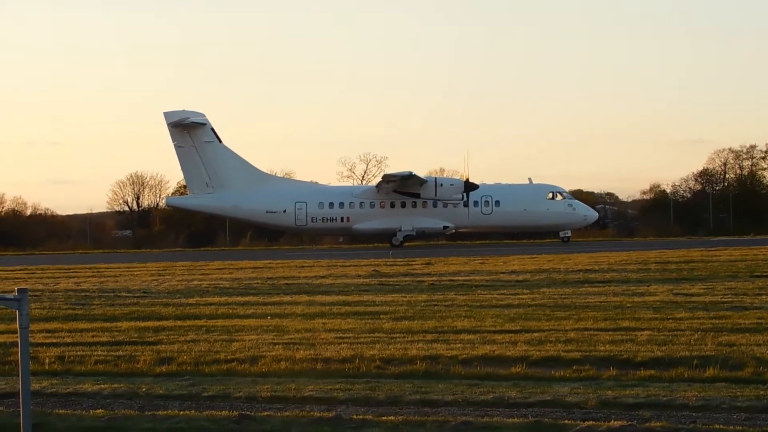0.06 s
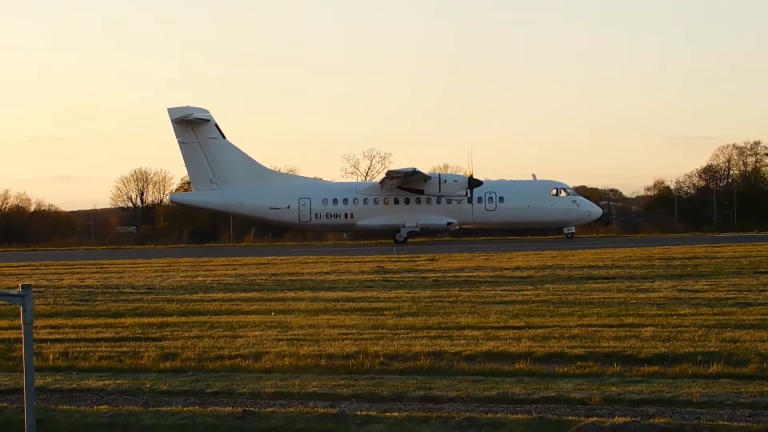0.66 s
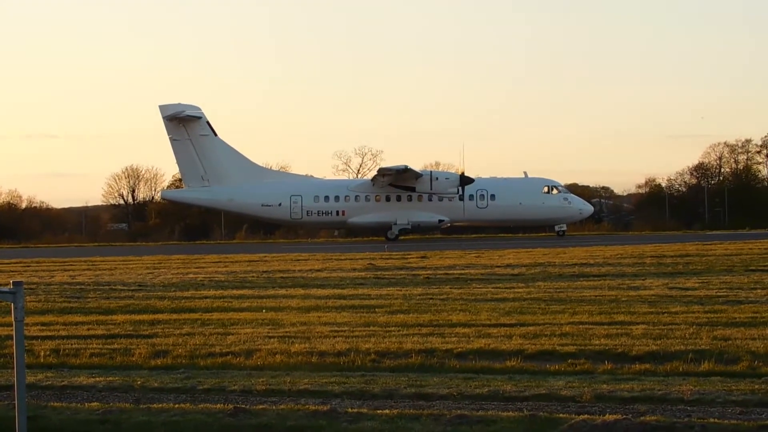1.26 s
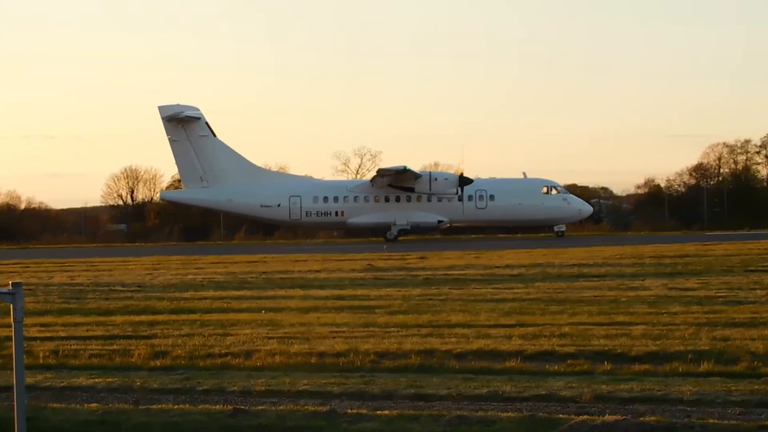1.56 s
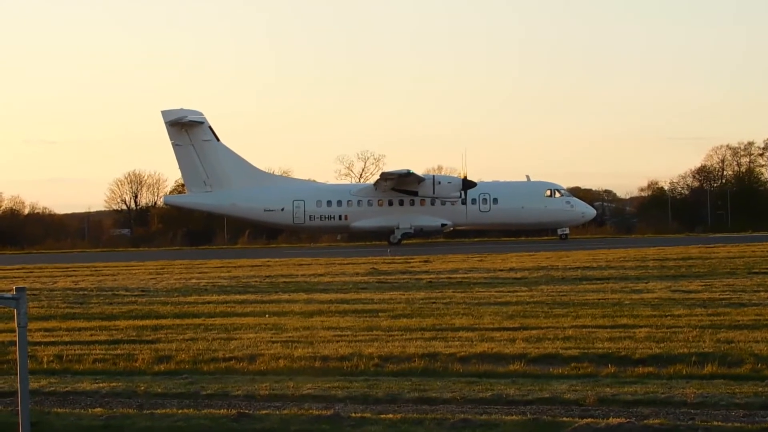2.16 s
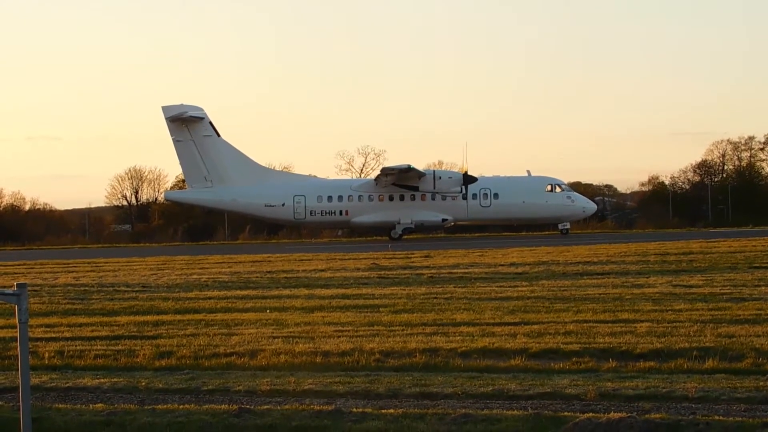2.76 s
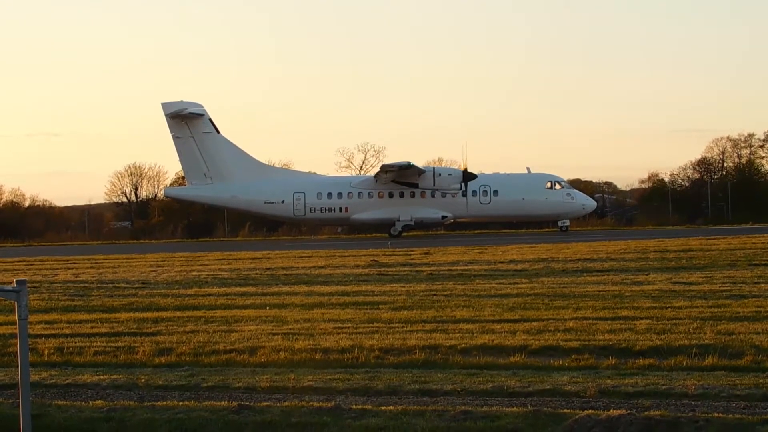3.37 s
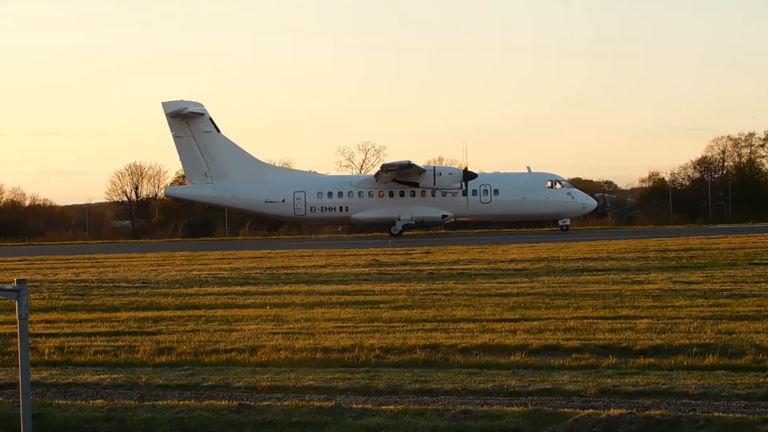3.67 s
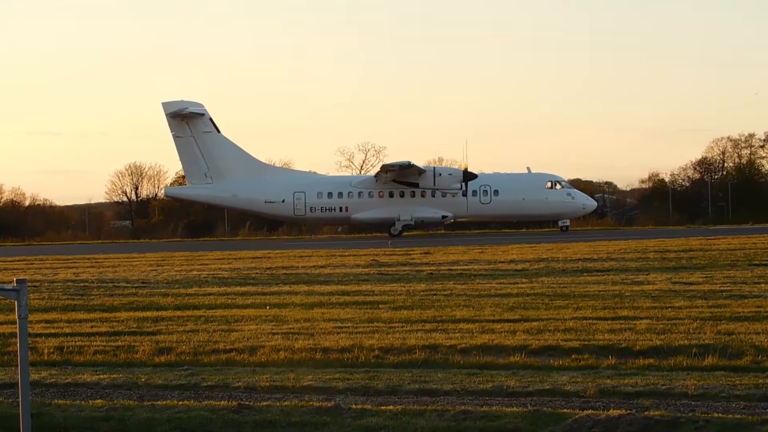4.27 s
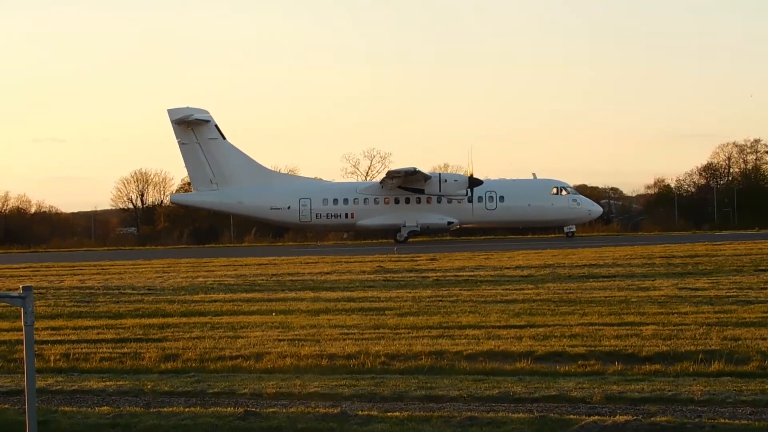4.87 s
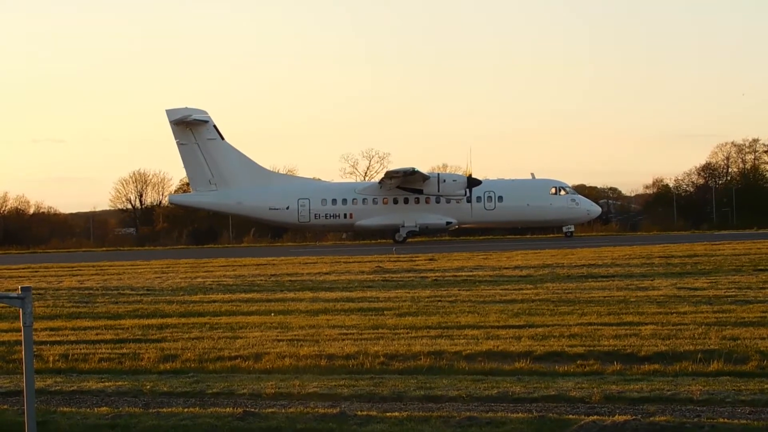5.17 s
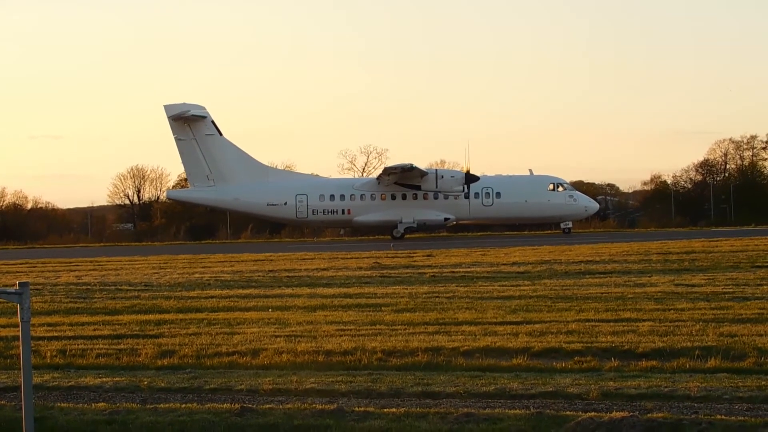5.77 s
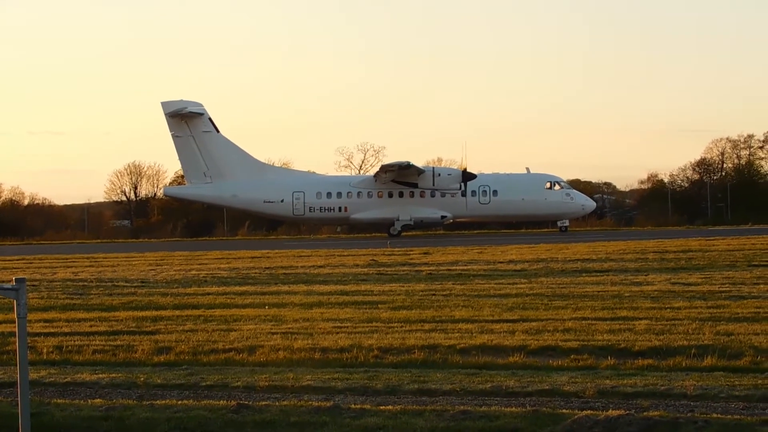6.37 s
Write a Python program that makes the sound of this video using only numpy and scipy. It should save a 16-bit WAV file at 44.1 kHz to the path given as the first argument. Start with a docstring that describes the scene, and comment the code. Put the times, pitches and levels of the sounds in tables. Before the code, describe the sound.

Turboprop engines drone steadily as a plane rolls slowly by, its propellers throbbing beneath a broad, slightly hollow roar.

```python
"""Twin turboprop taxiing past.

An airliner rolls slowly by, far across a grass airfield. Its propellers throb and chop a broad
rush of air; the engines add a wavering drone, a rumble, hiss and a thin whine. A ground bounce
combs the treble, and blade after blade cutting the same eddies gives the rush a hollow ring."""
import sys
import numpy as np
from scipy import signal
from scipy.fft import rfft, irfft, next_fast_len
from scipy.io import wavfile
from scipy.ndimage import map_coordinates

SR = 44100
rng = np.random.default_rng(int(sys.argv[2]) if len(sys.argv) > 2 else 0)


def pcm_store(signal):
    """Save signal as 16-bit PCM."""
    levels = np.round(np.clip(np.atleast_2d(signal), -1, 1) * 32767)
    wavfile.write(sys.argv[1], SR, levels.astype(np.int16).T)


N = 292383


def seconds():
    """Time of every sample."""
    return np.arange(N) / SR


def amp(db):
    """Decibels to gain."""
    return 10 ** (np.asarray(db) / 20)


def unit(x):
    """x at rms 1."""
    return x / np.sqrt(np.mean(x ** 2) + 1e-20)


def along(points, hz):
    """(frequency [Hz], value) points read on a log axis."""
    knots_hz, values = np.transpose(points)
    return np.interp(np.log(hz + 1), np.log(knots_hz + 1), values)


def curves(rows):
    """One value per sample for each column after the time."""
    time_s, *columns = np.transpose(rows)
    return [np.interp(seconds(), time_s, column) for column in columns]


def swell(middle_s, width_s, db):
    """Bell-shaped level excursion in dB."""
    return db * np.exp(-.5 * ((seconds() - middle_s) / width_s) ** 2)


def wobble(rate_hz):
    """Smooth random curve, rate_hz knots a second."""
    knots = rng.standard_normal(int(N * rate_hz / SR) + 4)
    return map_coordinates(knots, [seconds() * rate_hz])


def phase_of(hz):
    """Running phase of a steady or moving frequency."""
    return 2 * np.pi * (np.cumsum(hz * np.ones(N)) / SR + rng.random())


def filtered(x, response):
    """x through a complex frequency response."""
    size = next_fast_len(N + SR // 2)
    return irfft(rfft(x, size) * response(np.fft.rfftfreq(size, 1 / SR)), size)[..., :N]


def crested(x, centre_hz, width_hz, lift_db):
    """x with a bell-shaped spectral crest or hollow that may glide and swell."""
    hz, frame_s, spectra = signal.stft(x, SR, nperseg=1024)
    frame_at = np.minimum(frame_s * SR, N - 1).astype(int)
    per_frame = lambda curve: (curve * np.ones(N))[frame_at]
    bell = np.exp(-.5 * ((hz[:, None] - per_frame(centre_hz)) / width_hz) ** 2)
    return signal.istft(spectra * amp(bell * per_frame(lift_db)), SR)[1][:, :N]


# Left-right likeness: (frequency [Hz], correlation [ratio])
COHERENCE = [(25, 0.97), (100, .9995), (220, 1), (380, 0.92), (700, 0.91), (1000, 0.85), (1400, 0.63),
             (2300, 0.57), (2750, 0.2), (3200, 0.85), (3900, 0.12), (5600, 0.49), (8000, 0.91),
             (11000, 0.18)]

def stereo_noise(spectrum):
    """Shaped noise at rms 1: alike in the bass, wider in the treble."""
    def mid_side_gains(hz):
        angle = np.arccos(np.clip(along(COHERENCE, hz), -1, 1)) / 2
        return amp(along(spectrum, hz)) * [np.cos(angle), np.sin(angle)]
    mid, side = filtered(rng.standard_normal((2, N)), mid_side_gains)
    return unit(np.array([mid + side, mid - side]))


# Propeller partials: (harmonic [x blade rate], relative level [dB])
BLADE_HARMONICS = [(1, 3.5), (2, 3), (3, -5)]

def propeller_tones(blade_phase):
    """Each passing blade pushes the air: a deep throb that grows as the propellers come abeam."""
    final_db, rise_db, rise_s = -48.5, 9, 1.5
    level_db = final_db - rise_db * np.exp(-seconds() / rise_s)
    tones = sum(amp(db + .8 * wobble(6.1)) * np.sin(k * (blade_phase + .071 * wobble(4.15)))
                for k, db in BLADE_HARMONICS)
    return np.sqrt(2) * amp(level_db) * tones


# Slow drone swells: (time [s], level [dB])
DRONE_SWELLS = [(0, -34.5), (1.2, -35.5), (2, -33.5), (2.95, -32.5), (3.65, -34.5), (4.5, -31.5),
                (5.4, -33), (5.95, -35.5), (6.63, -31)]

def engine_drone():
    """The engines' wavering low note, with a weak octave."""
    pitch_hz, wander_hz, flutter_db = 105.5, .96, 1.6
    level_db, = curves(DRONE_SWELLS)
    phase = phase_of(pitch_hz + wander_hz * wobble(12))
    note = np.sin(phase) + amp(-21.5) * np.sin(2 * phase)
    return np.sqrt(2) * amp(level_db + flutter_db * wobble(14)) * note


# Exhaust noise: (frequency [Hz], relative density [dB])
RUMBLE_SPECTRUM = [(20, -29), (38, -24), (60, -18), (78, -9.5), (94, -17.5), (112, -2.5), (120, 0),
                   (135, -16.5), (150, -11.5), (170, -8), (238, -10), (280, -22.5), (430, -22), (500, -59)]

def exhaust_rumble():
    """Steady low noise from the exhausts."""
    return amp(-37.5) * stereo_noise(RUMBLE_SPECTRUM)


# Repeats about one blade passage later: (delay [s], relative gain [ratio])
EDDY_REPEATS = [(.01605, .15), (.01745, .33)]

def blade_repeats(x, strength, dull_hz):
    """Each blade cuts nearly the same eddies as the last: dull repeats, a hollow ring."""
    repeats = lambda hz: sum(gain * np.exp(-2j * np.pi * hz * delay_s) for delay_s, gain in EDDY_REPEATS)
    return filtered(x, lambda hz: 1 + strength * repeats(hz) / (1 + (hz / dull_hz) ** 2))


# Mid-band air noise: (frequency [Hz], relative density [dB])
ROAR_SPECTRUM = [(250, -37), (455, -22), (520, -13.5), (640, -9), (740, -2.5), (860, -1), (1030, -3.5),
                 (1200, 0.84), (1330, -1.5), (1480, -6), (1680, -10.5), (2100, -14), (3500, -61)]

def roar():
    """Body of the rush, ringing with the blade repeats."""
    return unit(blade_repeats(stereo_noise(ROAR_SPECTRUM), strength=.93, dull_hz=2400))


def over_ground(x):
    """Direct sound plus a ground bounce whose lag grows and settles as the aircraft rolls."""
    settled_ms, drift_ms, settle_s = .96, .093, .47
    flip_hz, flip_width_hz = 4800, 450  # bounce polarity inverts above flip_hz
    lag_ms = settled_ms - drift_ms * np.exp(-seconds() / settle_s)
    read_at = np.arange(N) - lag_ms * SR / 1000
    reflected = filtered(x, lambda hz: np.tanh((flip_hz - hz) / flip_width_hz))
    bounce = np.array([map_coordinates(side, [read_at], order=3) for side in reflected])
    bounce_db = -17.5 + swell(middle_s=1.6, width_s=1.1, db=5)
    return unit(x + amp(bounce_db) * bounce)


# Upper-mid air noise: (frequency [Hz], relative density [dB])
RASP_SPECTRUM = [(1200, -35), (1720, -5), (2020, 0.5), (2250, -1.5), (2500, -1.5), (2760, -6.5), (3000, -7),
                 (3330, -7), (3650, -12.5), (4200, -23), (6000, -60)]
# Crest in the rasp: (time [s], centre [Hz], lift [dB])
RASP_GLIDE = [(0, 2700, 4), (.45, 2740, 2.5), (1.4, 2150, 2.5), (3.4, 2130, 2.5), (4.6, 2420, 5),
              (6.63, 2520, 4.5)]

def rasp():
    """Edge of the rush; its crest sinks, then climbs and grows."""
    crest_hz, crest_db = curves(RASP_GLIDE)
    noise = crested(stereo_noise(RASP_SPECTRUM), crest_hz, width_hz=180, lift_db=crest_db)
    return over_ground(blade_repeats(noise, strength=.98, dull_hz=4000))


# Treble air noise: (frequency [Hz], relative density [dB])
HISS_SPECTRUM = [(2800, -33), (3800, 1.5), (4150, 1.5), (4500, 0), (4950, 0.5), (5300, -2.5), (5800, -5),
                 (6300, -8.5), (7000, -10), (8400, -16.5), (9800, -17.5), (10500, -24), (15500, -38)]

def hiss():
    """Top of the rush; a crest comes and goes, then a hollow."""
    crest_db = swell(middle_s=3.5, width_s=1.5, db=4.4)
    hollow_db = swell(middle_s=5.04, width_s=.54, db=-3)
    noise = crested(stereo_noise(HISS_SPECTRUM), centre_hz=5640, width_hz=330, lift_db=crest_db)
    noise = crested(noise, centre_hz=4670, width_hz=470, lift_db=hollow_db)
    return over_ground(blade_repeats(noise, strength=.71, dull_hz=6000))


# Air noise as the aircraft turns side-on: (time [s], roar [dB], rasp [dB], hiss [dB])
AIR_LEVELS = [(0, -27.4, -30.5, -46.5), (.55, -27, -30, -46.5), (1.2, -27.5, -29.5, -48),
              (2.6, -28.5, -32, -49), (3.4, -28.5, -31.5, -47.5), (5.2, -28, -32.5, -48.5),
              (5.95, -27.1, -31, -45), (6.63, -27.5, -30.5, -44)]

def air_rush(blade_phase):
    """Roar, rasp and hiss, chopped by the blades and flickering in the moving air."""
    roar_db, rasp_db, hiss_db = curves(AIR_LEVELS)
    chop = lambda depth: 1 + depth * np.cos(blade_phase)
    return (roar() * amp(roar_db + .14 * wobble(12)) * chop(depth=.047)
            + rasp() * amp(rasp_db + .25 * wobble(12)) * chop(depth=.14)
            + hiss() * amp(hiss_db + .28 * wobble(14)) * chop(depth=.12))


# Stereo balance: (frequency [Hz], left minus right [dB])
BALANCE = [(600, 1.5), (1200, -0.5), (2200, -1.1), (3200, -2), (4500, 1.8), (7000, -0.5), (12000, 1)]

def at_microphones(x, lead_ms):
    """Sound reaches the left microphone first; each side has its own colour."""
    sides = np.array([[.5], [-.5]])
    advance = lambda hz: np.exp(2j * np.pi * hz * sides * lead_ms / 1000)
    return filtered(x, lambda hz: amp(sides * along(BALANCE, hz)) * advance(hz))


def compressor_whine():
    """Two thin, blurred compressor tones: the lower fades, the higher swells once."""
    low_hz, high_hz, blur_hz, fade_db_per_s = 4970, 9010, 35, 1.7
    low_db = -67.5 - fade_db_per_s * seconds()
    high_db = -80 + swell(middle_s=6.05, width_s=.42, db=14)
    def tone(hz, db):
        gain = np.sqrt(2) * amp(db + 1.8 * wobble(12))
        return gain * np.sin(phase_of(hz + blur_hz * wobble(150)))
    return np.array([tone(low_hz, low_db) + tone(high_hz, high_db) for _ in range(2)])


def scene():
    """Propellers and engines, both propellers governed to one nearly constant speed."""
    blade_hz, wander_hz = 56.65, .078
    blade_phase = phase_of(blade_hz + wander_hz * wobble(2.27))
    bass = propeller_tones(blade_phase) + engine_drone() + exhaust_rumble()
    air = at_microphones(air_rush(blade_phase), lead_ms=.016)
    return bass + air + compressor_whine()


def record(dry):
    """Faint microphone hiss, then a hard band limit."""
    noise_db, top_hz = -60, 15750
    noise_colour = lambda hz: amp(along([(1000, 0), (11000, 0), (15500, -2)], hz))
    self_noise = filtered(rng.standard_normal((2, N)), noise_colour)
    return filtered(dry + amp(noise_db) * self_noise, lambda hz: hz < top_hz)


dry = scene()
out = record(dry)
pcm_store(out)
```